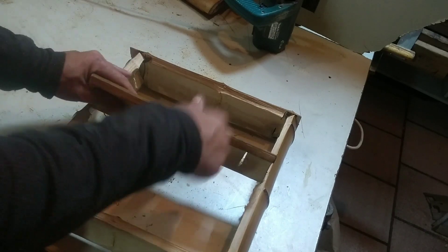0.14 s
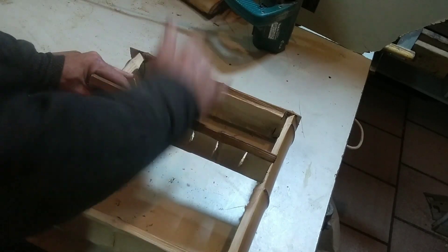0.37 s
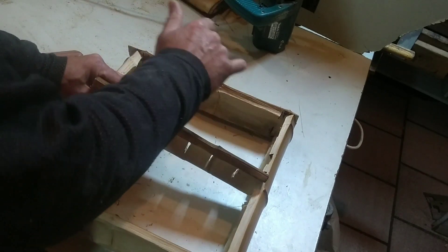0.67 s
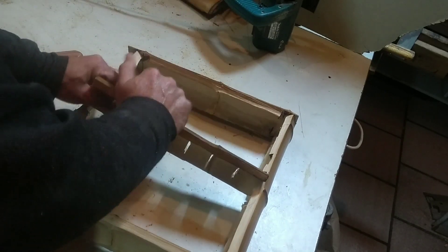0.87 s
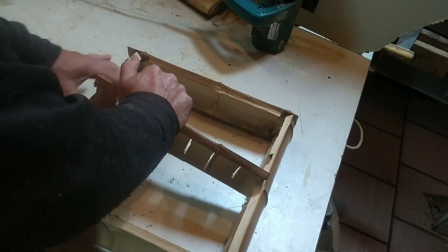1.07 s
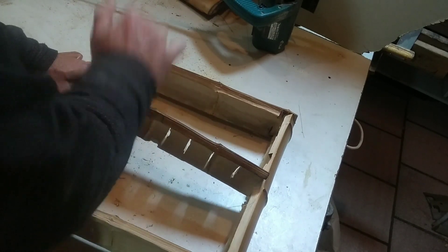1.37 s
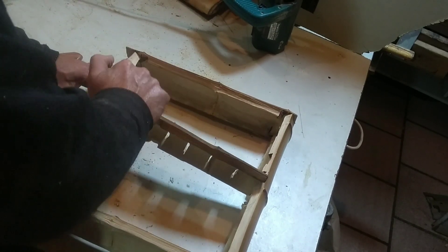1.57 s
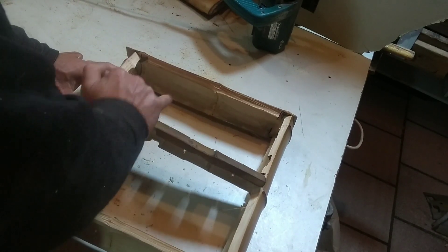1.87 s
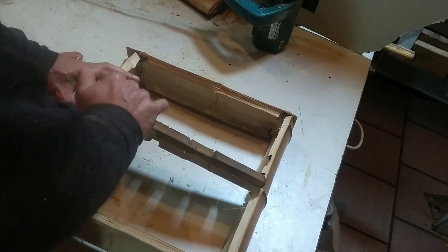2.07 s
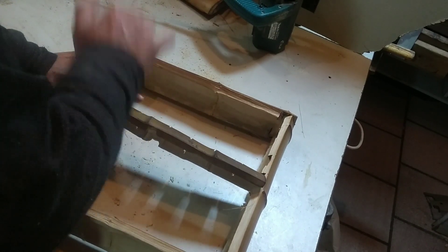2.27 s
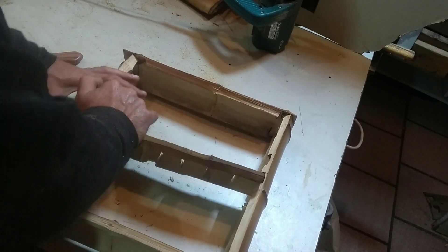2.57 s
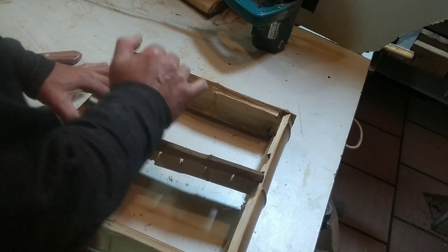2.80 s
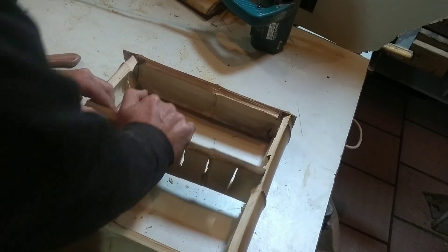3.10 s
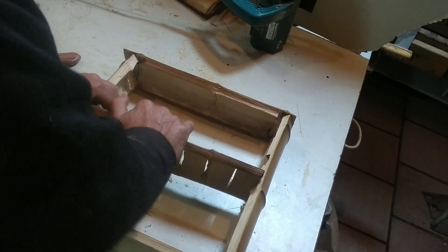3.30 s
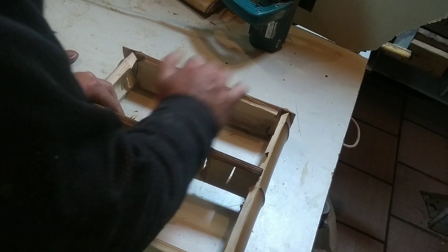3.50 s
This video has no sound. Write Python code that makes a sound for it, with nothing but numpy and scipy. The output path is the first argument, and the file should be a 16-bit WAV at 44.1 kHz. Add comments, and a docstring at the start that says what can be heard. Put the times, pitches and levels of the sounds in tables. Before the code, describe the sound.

A hand knocks bamboo slats into a wooden frame on a bench: four hard, clattering knocks about a second apart, fainter clicks and scrapes between, in a small workshop, recorded close in stereo.

```python
"""Knocking bamboo slats into a frame

A palm knocks and presses bamboo slats into a wooden frame on a workbench in a small workshop.
Each blow is a short cluster of contacts: impulses excite decaying frame and slat modes, with a noise crack.
Slats grind in their notches as dense random grains exciting damped modes; hands and sleeves rub as shaped hiss.
A narrow low rumble and broad room noise lie below; two spaced ports hear it all with phase and level differences.
"""
import sys
import numpy as np
from scipy import signal
from scipy.fft import rfft, irfft, next_fast_len
from scipy.io import wavfile

SR = 44100
rng = np.random.default_rng(int(sys.argv[2]) if len(sys.argv) > 2 else 0)


def persist_wave(psi):
    """Save psi, clipped to +-1, as 16-bit WAV."""
    counts = np.round(np.clip(psi, -1, 1) * 32767).astype(np.int16)
    wavfile.write(sys.argv[1], SR, np.atleast_2d(counts).T)


N = 160965

# Rubbing of skin and sleeves, one list from each jolt to the next. Each row: time in seconds,
# relative level in dB, relative level of the bright part above the split in dB.
RUB_STROKES = [
    [(0.0, -67, -9), (0.01, -73, -4), (0.112, -63.5, -10), (0.23, -71, -7.5), (0.41, -69, -7.5),
     (0.424, -64, -16), (0.434, -51, -12)],
    [(0.436, -53, -8), (0.446, -39, -10.5), (0.528, -54, -9.5), (0.572, -56, -14.5), (0.742, -72.5, -7.5),
     (0.856, -68.5, -9), (0.864, -63, -10)],
    [(0.866, -53, -10), (0.882, -66, 4.5), (0.954, -54.5, -14.5), (1.15, -70.5, -3.5), (1.202, -68.5, -9.5),
     (1.438, -70.5, -7), (1.45, -61, -7)],
    [(1.453, -51, -5.5), (1.507, -39.5, -8), (1.683, -64.5, -12.5), (1.839, -71, -8), (1.955, -68.5, -5.5),
     (2.415, -71, -8), (2.43, -55, -13)],
    [(2.433, -45, -6), (2.437, -37, -15.5), (2.579, -61, -4), (2.725, -78, -10), (2.863, -76.5, -4),
     (3.103, -65.5, -7.5), (3.114, -55, -12)],
    [(3.117, -42, -16), (3.151, -48.5, -7), (3.159, -53, -1), (3.209, -59, -5.5), (3.232, -59, -6)],
    [(3.235, -47, -14), (3.339, -65, -12), (3.352, -60, -12)],
    [(3.356, -49, -15), (3.368, -38.5, -28), (3.502, -61, -23), (3.564, -69.5, -8.5), (3.588, -66, -17),
     (3.632, -72, -6.5), (3.65, -68, -12)],
]
# Spectrum of the rubbing hiss. Each row: frequency in Hz, relative density in dB per Hz.
RUB_SPECTRUM = [(1060, -28.5), (1800, -4), (2380, -5.5), (3550, -7.5), (4940, -8), (5780, -11), (7910, -14),
                (11400, -13.5), (14400, -25.5)]
RUB_DB, RUB_SPLIT_HZ, RUB_BRIGHT_DB = 6.5, 4540, 6.5
RUB_GRAIN_DB, RUB_GRAIN_HZ = 0.63, 250  # rms depth and upper frequency of the level flutter

# Background levels. Each row: time in seconds, relative level of the rumble in dB,
# relative level of the room noise in dB.
BACKGROUND_LEVELS = [(0.0, -50, -52), (0.42, -52.5, -55.5), (0.56, -53, -53.5), (1.27, -59, -55.5),
                     (1.46, -57, -53.5), (1.59, -61, -53), (1.82, -65, -53.5), (2.41, -65, -53.5),
                     (2.6, -72, -59), (2.81, -81.5, -58), (3.03, -74.5, -60), (3.3, -75, -56.5),
                     (3.49, -72, -59), (3.65, -76.5, -56.5)]
# Spectrum of the room noise. Each row: frequency in Hz, relative density in dB per Hz.
AIR_SPECTRUM = [(15, -44), (25, -24), (65, -1.5), (245, -9.5), (286, -12), (320, -13), (1410, -21),
                (2460, -45.5), (3670, -38), (5000, -42.5), (6500, -63.5), (11000, -120)]
RUMBLE_HZ, RUMBLE_WIDTH_HZ, RUMBLE_DB, AIR_DB = 58.4, 9, 6.5, 2

# Contacts of palm, slat and frame. Each row: start in seconds, relative level in dB, thud near 150 Hz in dB,
# body near 400 Hz in dB, edge near 3 kHz in dB, slat ring in dB, left against right in dB.
CONTACTS = [(0.432,-27.5,8,0,12,-19,1), (0.4402,-8.5,6.5,8.5,6,-10,3), (.445,-7,-2,13,-0.5,-23,4.5),
            (0.4488,-12,-5.5,5.5,2,-3.5,0.5), (.455,-11.5,-12,-10,3,-21,4), (.460,-7,-10,6,-5,-18,0),
            (.468,-13,5,-9,-6,-11,-3), (0.5604,-10,1.5,-10,-5,-16,0.5), (0.572,-28,16,0,-10,-19,-10),
            (.581,-29,-0.5,11.5,-8,-23,-1), (.881,-29.5,22.5,13,-6,-29,1.5), (.891,-29.5,13,13.5,-5,-21,8),
            (.901,-23,9.5,-4,-16,-6.5,1), (.945,-33,11,4,2,-9,2), (.988,-27.5,0,4,10,-15,-5),
            (1.049,-34,18.5,18,-3,-11,2), (1.455,-23,9.5,10,0,-3,2), (1.4625,-6,7.5,3.5,7.5,-9,2.5),
            (1.469,-18,-1,-7,-11,-32,1), (1.481,-13,-8,-12,6,0,-1.5), (1.489,-13,0,-2,2,-28,19),
            (1.518,-9.5,-6,-8,7,-23,0), (2.433,-15.5,2.5,5.5,2,-20.5,2), (2.438,-5.5,-11.5,0,4.5,-8,-1),
            (2.441,-2.5,-5,4,1.5,-22.5,1.5), (2.4464,5.5,-11.5,-16.5,-10,-24.5,3),
            (2.466,-15,0,2.5,-6,-9.5,0), (2.476,-32,0,-11,-1,-18.5,-4), (2.730,-36.5,-6.5,-6,-9,-14.5,0),
            (3.048,-31,5.5,-2,-18,-28,3), (3.070,-32,9,-9,0,-33,4), (3.105,-28.5,-15,-3,-6.5,-20,12),
            (3.118,-16.5,-3,-4,5,-25,1), (3.156,-24.5,3,-5.5,-8,-18,1), (3.236,-23.5,-4,-3.5,10.5,-27,2.5),
            (3.355,-24.5,-9,-7.5,6,-15.5,3.5), (3.3648,-8,-28,3,-7,-1,0.5), (3.369,-8.5,-31,9,1,6,0)]
# Frame and bench modes. Each row: frequency in Hz, relative level in dB,
# time to decay by 60 dB in seconds (shortened when grinding).
FRAME_MODES = [(111.7, -7.5, .15), (158.2, -8, 0.13), (208.5, -8, 0.1), (317, -3, 0.068), (420, -2, 0.045),
               (516.6, -3.5, 0.061), (627.5, -3, 0.059), (718, 1, 0.03), (868, 1.5, 0.042), (940, 2, 0.036),
               (1252, 1, 0.018), (1521, -1, 0.018), (1730, -7.5, 0.023), (2274, -12.5, 0.018),
               (2730, -12.5, 0.012), (3534, -21.5, 0.012)]
# Slat modes. Each row: frequency in Hz, relative level in dB, time to decay by 60 dB in seconds.
SLAT_MODES = [(443.6, -22, 0.14), (610, -24.5, 0.11), (948, -14, 0.085), (1076, -6, 0.12),
              (1128, -13, 0.13), (1302, -19, 0.032), (1662, -21.5, 0.07), (1848, -21, 0.089)]
KNOCK_DB, MODE_SPREAD_DB = -13.5, 4.5
CRACK_DB, CRACK_T60_S, CRACK_LOW_HZ, CRACK_HIGH_HZ = -33, 0.01, 2010, 8900

# Strokes of slats grinding and rattling in the notches, one list a stroke. Each row: time in seconds,
# relative level in dB, modes below the split against it in dB, ring of the loose slat against it in dB.
GRIND_STROKES = [
    [(0.47, -38, 1, -2), (0.492, -37, -2, -4), (0.536, -37, -2, -9), (0.554, -40, -1, -9),
     (0.559, -27, -12, -7)],
    [(0.562, -29.5, -2.5, -19), (0.58, -35.5, 6.5, -15), (0.62, -35.5, 1, -17), (0.712, -57.5, 5, -15),
     (0.764, -64.5, 0, -13), (0.78, -75, 17, -9)],
    [(0.86, -60, 4, -11), (0.878, -44.5, 11.5, -9), (0.914, -33, -3, -15), (1.042, -43, 2.5, -9),
     (1.046, -43, 9, -8), (1.2, -62, -5, -11)],
    [(1.47, -20, -2, -9), (1.474, -20.5, 9.5, -7), (1.522, -25, -22, -10), (1.54, -28, 0, -8),
     (1.8, -66, 2, -18)],
    [(2.452, -25, -10, -6), (2.46, -30, 3.5, -5.5), (2.584, -47, 1.5, -7.5), (2.672, -54.5, -11.5, -8.5),
     (2.72, -74, -8, -9.5)],
    [(2.95, -70, 2, -7), (2.998, -59, 8, -10), (3.028, -71, 12, -11), (3.046, -50.5, -4.5, -11.5),
     (3.098, -42.5, -1.5, -12), (3.116, -34, -7, -13)],
    [(3.119, -37, -8, -11), (3.149, -41.5, -4, -15), (3.157, -34, -8, -4), (3.165, -42, -3, -12),
     (3.229, -49, 3, -9), (3.234, -47, -7, -8)],
    [(3.237, -34, -10, -9), (3.255, -47, -5, -9), (3.271, -46, -9, -9), (3.327, -64.5, 8.5, -7),
     (3.35, -58.5, -4, -6)],
    [(3.375, -19, -15.5, -14), (3.453, -37.5, -12.5, -3), (3.62, -62, -14, -2)],
]
GRIND_DB, GRIND_SPLIT_HZ, GRIND_UNLIKE = -0.5, 350, 0.1  # last: power share that differs between ports
GRAINS_PER_S, GRAIN_SPREAD_DB, GRIND_DAMPING = 1500, 3.5, 0.36  # damping multiplies the decay times
BENCH_LOW_HZ = 70

# Reverberation of the workshop. Each row: frequency in Hz, time to decay by 60 dB in seconds
# before the gradual rise of the tail.
ROOM_DECAY = [(100, 0.48), (400, 0.43), (1000, 0.27), (3000, 0.38), (10000, 0.55)]
ROOM_DB, ROOM_RISE_S = -11.5, 0.018

# Difference between the microphone ports. Each row: frequency in Hz, phase lead of the left in radians,
# left against right in dB.
PORT_DIFFERENCE = [(30, -2.5, 1), (148, -1.72, -9), (320, 0.36, -8), (546, 1.26, -4), (1160, -0.32, -1),
                   (1580, -1, -3), (2115, -2, -3), (2270, -2.5, -2), (2970, -4.5, -3.5), (4850, -9, -1),
                   (7160, -14.5, -5), (9910, -22, -2.5), (15600, -32.5, -6.5)]
# Decorrelation of diffuse sound. Each row: frequency in Hz, power share that differs between ports (0 to 1).
UNLIKE_SHARE = [(60, 0.34), (200, 1), (1000, 0.11), (3000, 0), (6000, 0.54), (12000, 1)]
PEAK, TOP_HZ = 1.4, 14350  # height that peaks round off towards, edge of the low-pass


def from_db(db):
    """Amplitude gain is ten to the power of the level in dB over 20."""
    return 10 ** (np.asarray(db) / 20)


def rms_one(x):
    """Division by the root mean square gives a signal unit rms."""
    return x / np.sqrt(np.mean(x ** 2) + 1e-20)


def in_time(rows):
    """Linear interpolation turns each column of a time table into an envelope."""
    s, *columns = np.transpose(rows)
    return [np.interp(np.arange(N) / SR, s, c) for c in columns]


def at_hz(points, hz):
    """Interpolation on a logarithmic frequency axis reads a spectral table."""
    knots, values = np.transpose(points)
    return np.interp(np.log(hz + 1), np.log(knots), values)


def band_pass(x, low_hz, high_hz):
    """A Butterworth band-pass keeps the frequencies between two edges."""
    return signal.sosfilt(signal.butter(2, [low_hz, high_hz], "band", fs=SR, output="sos"), x)


def ring(clicks, hz, t60):
    """A two-pole resonator answers an impulse with an exponentially damped sine."""
    r, w = from_db(-60 / (t60 * SR)), 2 * np.pi * hz / SR
    return signal.lfilter([0, np.sin(w)], [1, -2 * r * np.cos(w), r * r], clicks + 1e-18)


def diffuse(size):
    """Partial coherence: two noises share power by frequency, as in a diffuse field at two points."""
    both, own = rfft(rng.standard_normal((2, size)))
    share = at_hz(UNLIKE_SHARE, np.fft.rfftfreq(size, 1 / SR))
    left = np.sqrt(1 - share) * both + np.sqrt(share) * own
    return irfft([left, both], size)


def coloured(spectrum):
    """Spectral shaping weights diffuse white noise by a table, silent below its first frequency."""
    hz = np.fft.rfftfreq(N, 1 / SR)
    gain = (hz > spectrum[0][0]) * from_db(at_hz(spectrum, hz))
    return rms_one(irfft(rfft(diffuse(size=N)) * gain, N))


def rub():
    """Rubbing friction is a broadband hiss whose level and brightness vary in time, with a fine flutter."""
    db, bright_db = in_time(np.vstack(RUB_STROKES))
    hiss = coloured(RUB_SPECTRUM)
    # zero-phase filtering, so that the remainder is the lower part
    top = signal.sosfiltfilt(signal.butter(2, RUB_SPLIT_HZ, "high", fs=SR, output="sos"), hiss)
    low_pass = signal.butter(2, RUB_GRAIN_HZ, fs=SR, output="sos")
    flutter = rms_one(signal.sosfilt(low_pass, rng.standard_normal(N)))
    level = from_db(db + RUB_DB + RUB_GRAIN_DB * flutter)
    return level * (hiss - top + from_db(bright_db + RUB_BRIGHT_DB) * top)


def background():
    """Stationary noise under slow envelopes: a narrow band heard as rumble, a broad one as room noise."""
    rumble_db, air_db = in_time(BACKGROUND_LEVELS)
    half_width = RUMBLE_WIDTH_HZ / 2
    rumble = rms_one(band_pass(diffuse(size=N), RUMBLE_HZ - half_width, RUMBLE_HZ + half_width))
    air = coloured(AIR_SPECTRUM)
    return from_db(rumble_db + RUMBLE_DB) * rumble + from_db(air_db + AIR_DB) * air


def knocks():
    """Modal excitation: each contact is an impulse that rings frame and slat and releases a noise crack."""
    s, db, thud_db, body_db, edge_db, slat_db, pan_db = np.transpose(CONTACTS)
    at = (s * SR).astype(int)
    side_db = pan_db * [[.5], [-.5]]
    luck = rng.standard_normal((len(s), len(FRAME_MODES)))  # uneven excitation of each mode
    clicks, out = np.zeros((2, N)), np.zeros((2, N))

    for k, (hz, level_db, t60) in enumerate(FRAME_MODES):
        colour_db = [at_hz([(150, thud), (400, body), (900, 0), (3000, edge)], hz)
                     for thud, body, edge in zip(thud_db, body_db, edge_db)]
        mode_db = KNOCK_DB + level_db + MODE_SPREAD_DB * luck[:, k]
        clicks[:, at] = from_db(db + colour_db + side_db + mode_db)
        out += ring(clicks, hz, t60) * (-1) ** k  # neighbouring modes have opposite sign

    clicks[:, at] = from_db(db + slat_db + side_db)
    for hz, level_db, t60 in SLAT_MODES:
        out += from_db(level_db) * ring(clicks, hz, t60)

    clicks[:, at] = from_db(db + CRACK_DB + edge_db + side_db)
    decay = from_db(-60 / (CRACK_T60_S * SR))
    envelope = signal.lfilter([1], [1, -decay], clicks + 1e-18)
    crack = band_pass(envelope * rng.standard_normal(N), CRACK_LOW_HZ, CRACK_HIGH_HZ)
    return out + crack


def grind():
    """Stick-slip as a random impulse train: uneven grains excite damped frame modes and the loose slat."""
    spread = np.minimum(rng.exponential(1, (2, N)), 3)
    sizes = from_db(GRAIN_SPREAD_DB * spread) * rng.choice([-1, 1], (2, N))
    both, own = (rng.random((2, N)) < GRAINS_PER_S / SR) * sizes
    left = np.sqrt(1 - GRIND_UNLIKE) * both + np.sqrt(GRIND_UNLIKE) * own
    grains = np.array([left, both])

    low, high = np.zeros((2, N)), np.zeros((2, N))
    for k, (hz, db, t60) in enumerate(FRAME_MODES):
        part = low if hz < GRIND_SPLIT_HZ else high
        part += from_db(db) * ring(grains, hz, t60 * GRIND_DAMPING) * (-1) ** k
    low, high = rms_one(low), rms_one(high)
    slat = rms_one(sum(from_db(db) * ring(grains, hz, t60) for hz, db, t60 in SLAT_MODES))

    t, out = np.arange(N) / SR, np.zeros((2, N))
    for stroke in GRIND_STROKES:
        s = np.transpose(stroke)[0]
        db, bass_db, slat_db = in_time(stroke)
        fade = np.clip(np.minimum(t - s[0], s[-1] - t) / .003, 0, 1)  # 3 ms at each end
        mixed = high + from_db(bass_db) * low + from_db(slat_db) * slat
        out += fade * from_db(db) * mixed
    return from_db(GRIND_DB) * out


def workshop(x):
    """Reverberation by convolution with a diffuse tail whose octave bands decay at their own rates."""
    t, tail = np.arange(SR // 2) / SR, 0
    for low_hz in 60 * 2.0 ** np.arange(8):
        band = band_pass(diffuse(size=len(t)), low_hz, 2 * low_hz)
        t60 = at_hz(ROOM_DECAY, low_hz * np.sqrt(2))
        tail = tail + band * from_db(-60 * t / t60)
    tail = tail * np.clip(t / ROOM_RISE_S, 0, 1)
    tail = tail / np.sqrt(np.sum(tail[1] ** 2))  # unit energy at the right port
    return from_db(ROOM_DB) * signal.fftconvolve(x[None], tail, axes=1)[:, :N]


def scene():
    """Superposition: rubbing and background add to the bench sounds and their reverberation."""
    high_pass = signal.butter(2, BENCH_LOW_HZ, "high", fs=SR, output="sos")
    bench = signal.sosfilt(high_pass, knocks() + grind())
    return rub() + background() + bench + workshop(bench.mean(axis=0))


def record(dry):
    """Spaced ports differ in phase and level by frequency; peaks saturate softly and the top is cut."""
    size = next_fast_len(N + 4096)  # padding for the phase shifts
    hz = np.fft.rfftfreq(size, 1 / SR)
    knots, lead, db = np.transpose(PORT_DIFFERENCE)
    half_db = np.interp(hz, knots, db) / 2
    phase = np.exp(1j * np.interp(hz, knots, lead))
    ports = [from_db(half_db) * phase, from_db(-half_db)]
    heard = irfft(rfft(dry, size) * ports, size)[:, :N]
    rounded = PEAK * np.tanh(heard / PEAK)
    return signal.sosfilt(signal.ellip(12, .5, 80, TOP_HZ, fs=SR, output="sos"), rounded)


dry = scene()
out = record(dry)
persist_wave(out)
```